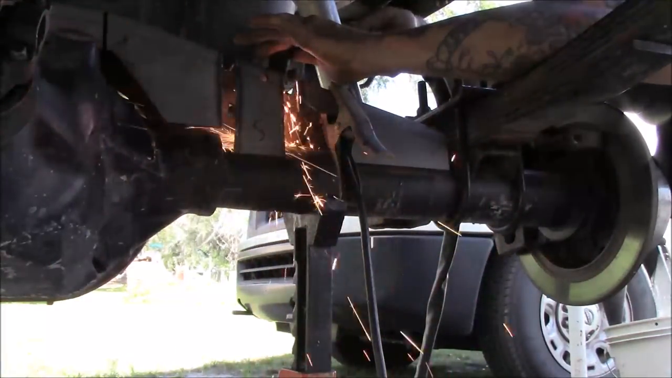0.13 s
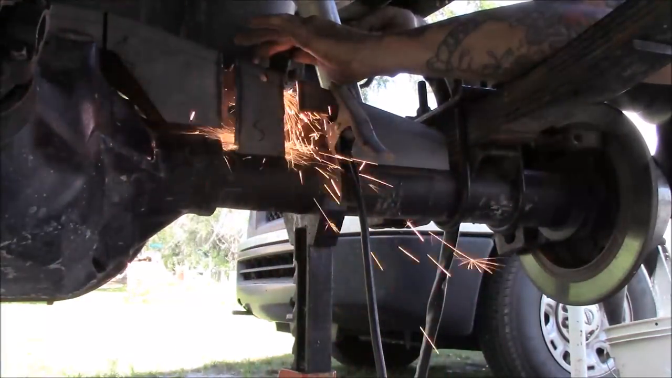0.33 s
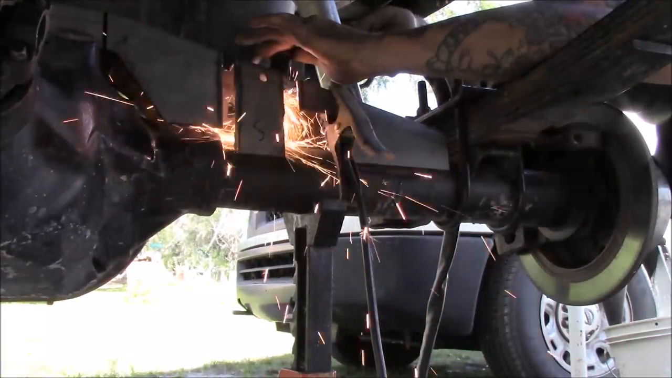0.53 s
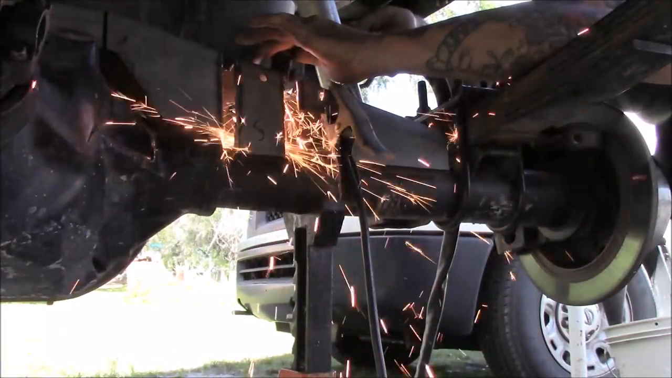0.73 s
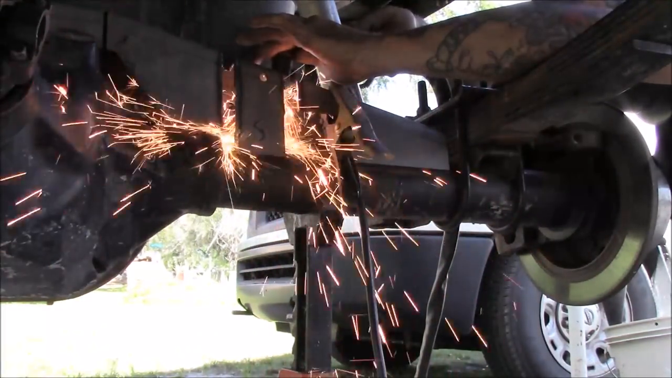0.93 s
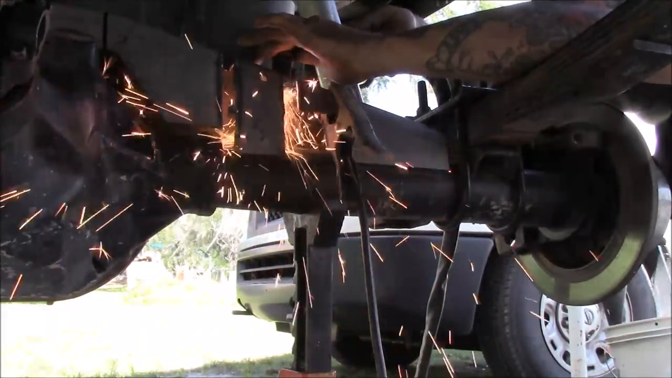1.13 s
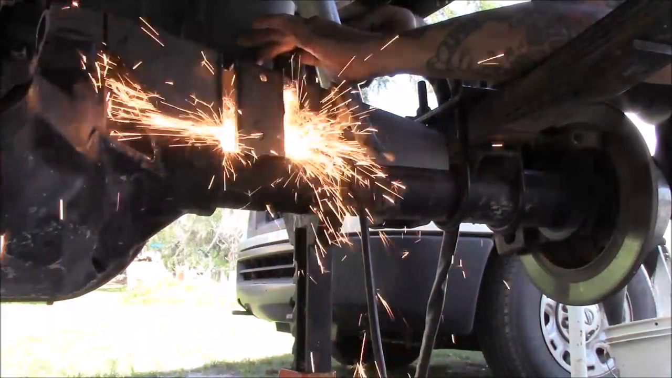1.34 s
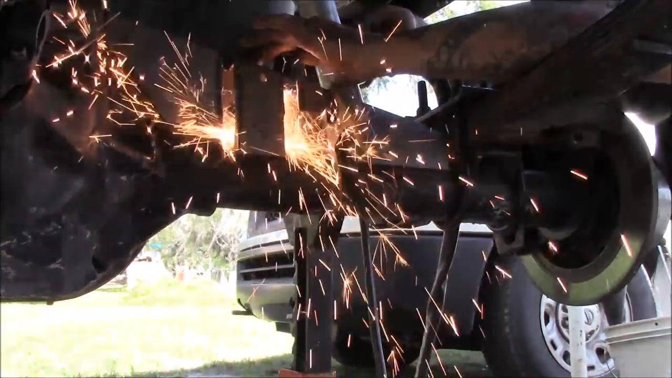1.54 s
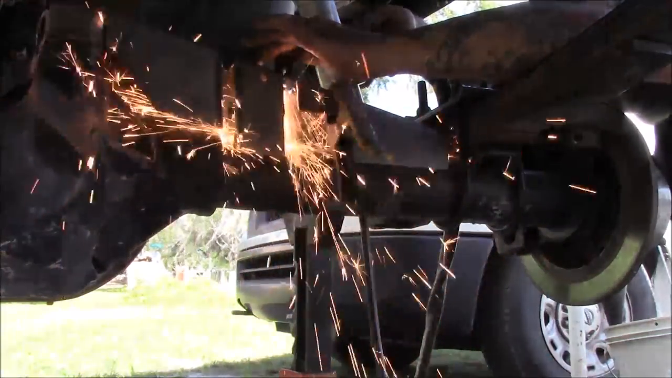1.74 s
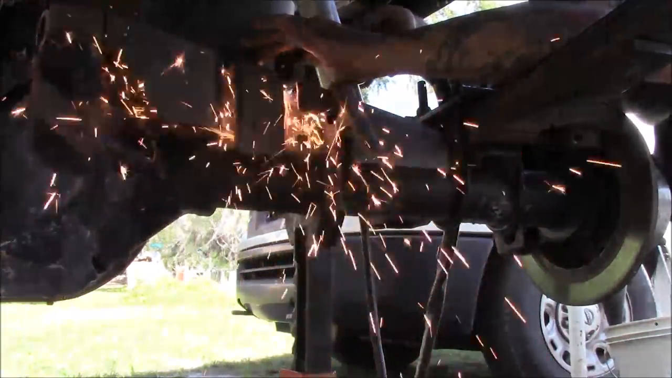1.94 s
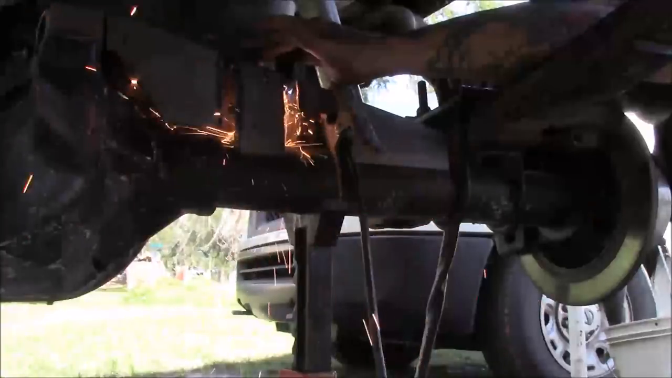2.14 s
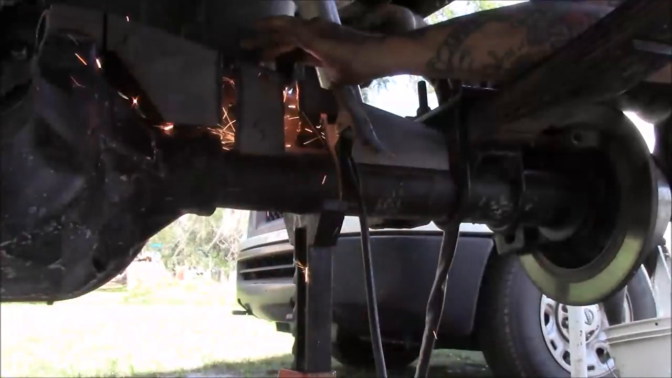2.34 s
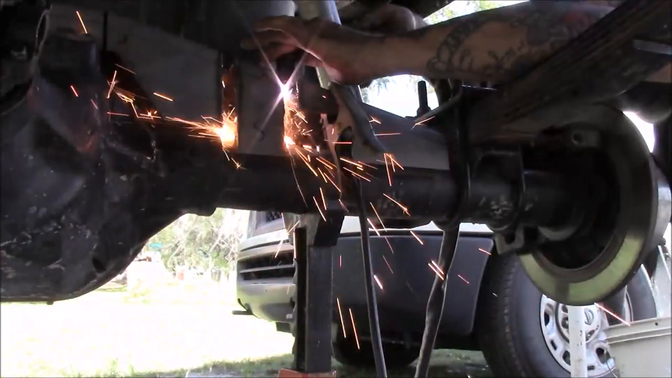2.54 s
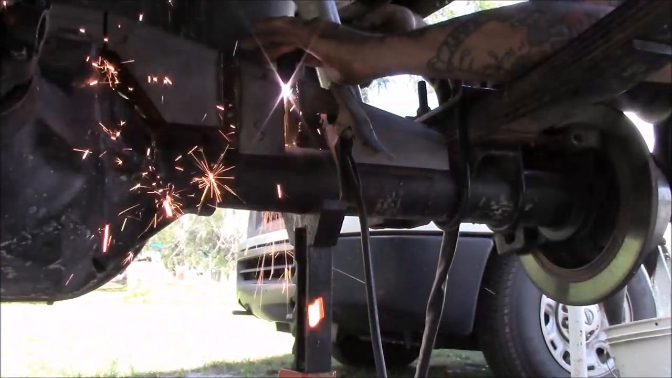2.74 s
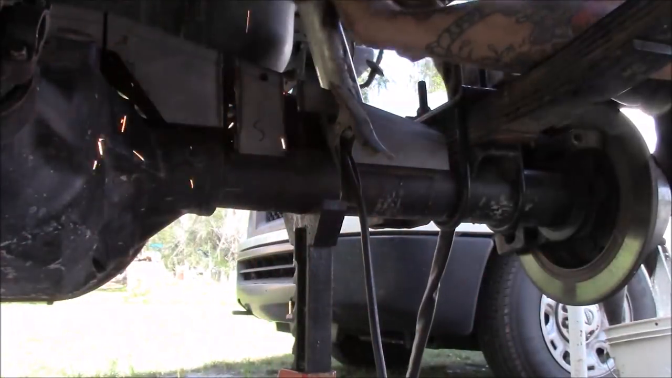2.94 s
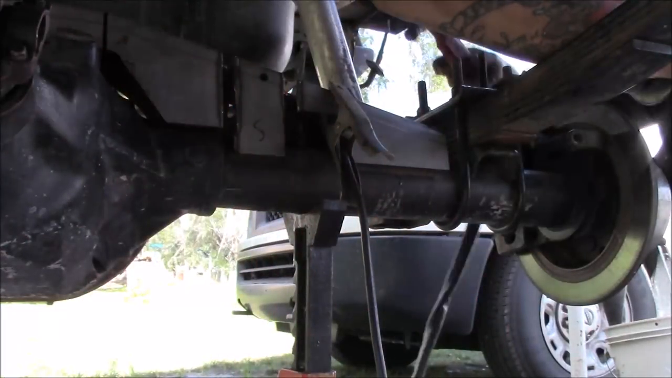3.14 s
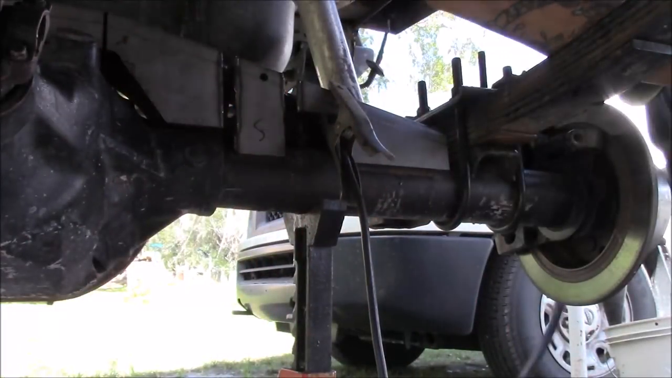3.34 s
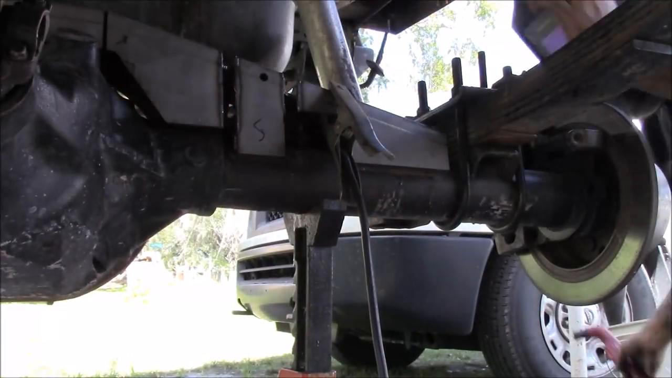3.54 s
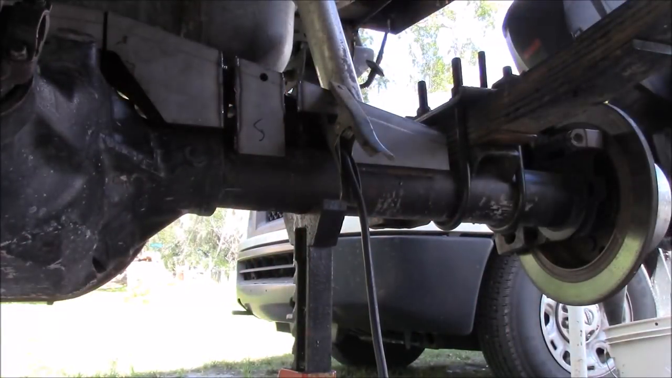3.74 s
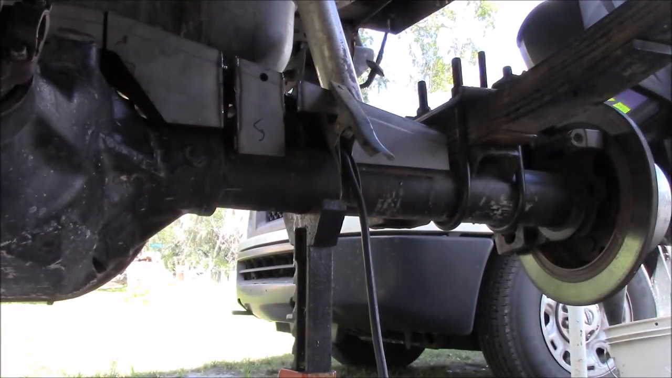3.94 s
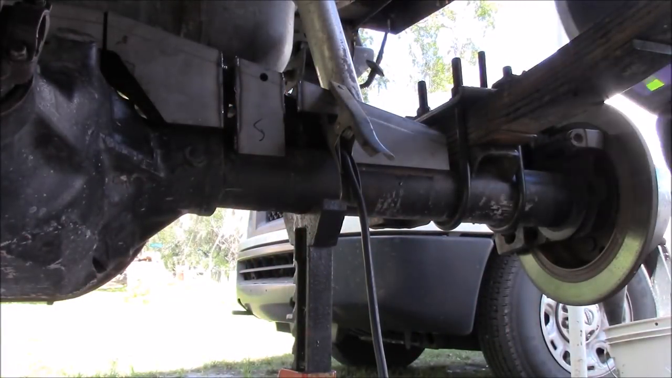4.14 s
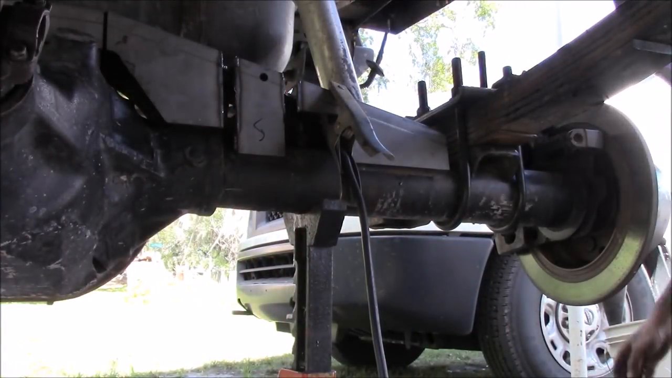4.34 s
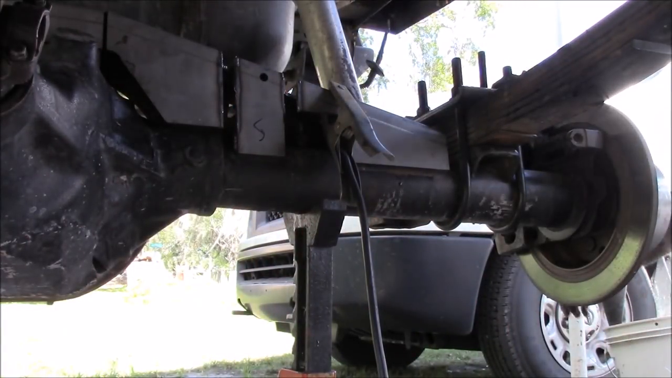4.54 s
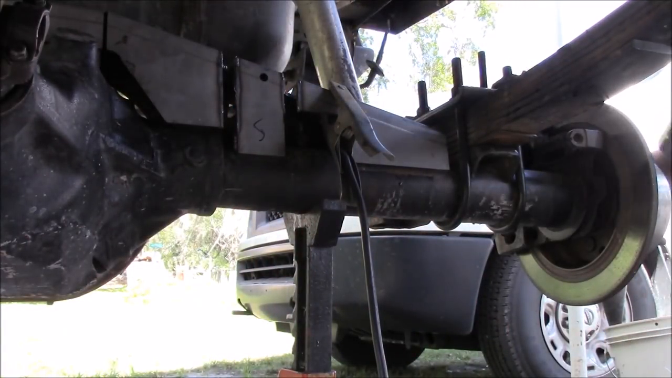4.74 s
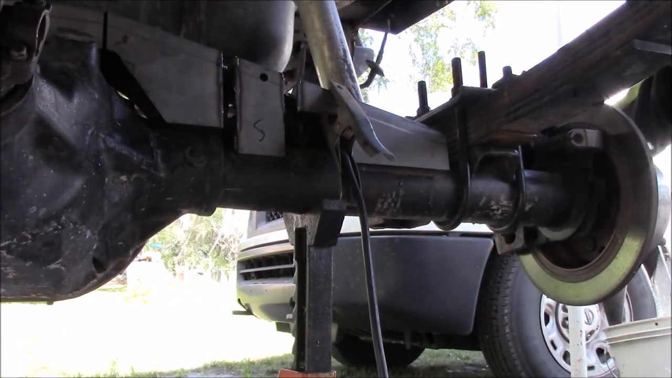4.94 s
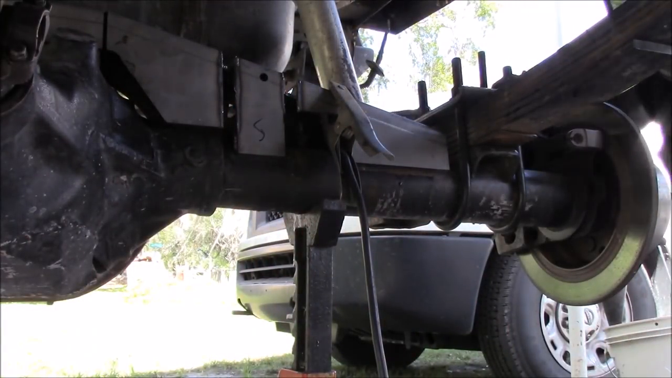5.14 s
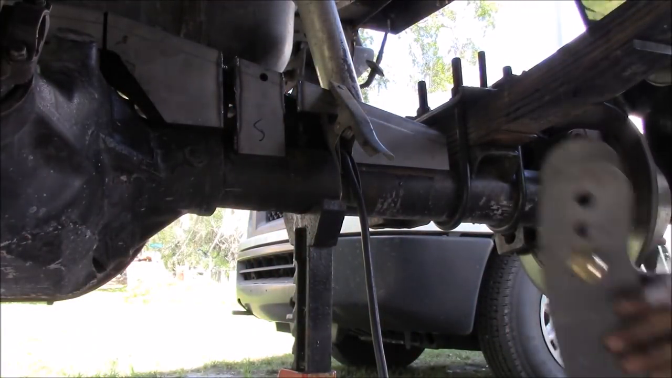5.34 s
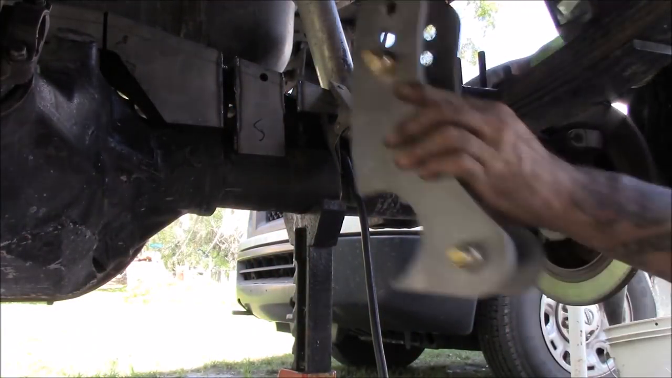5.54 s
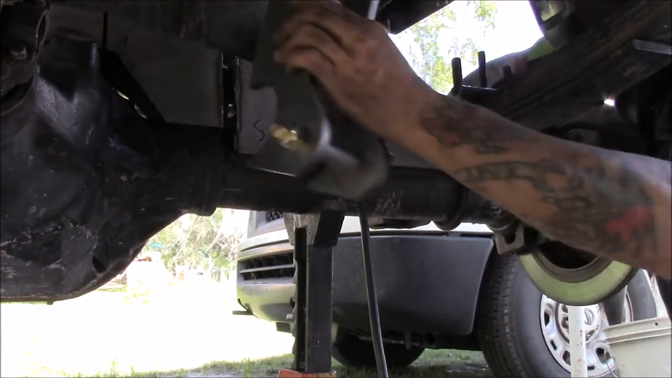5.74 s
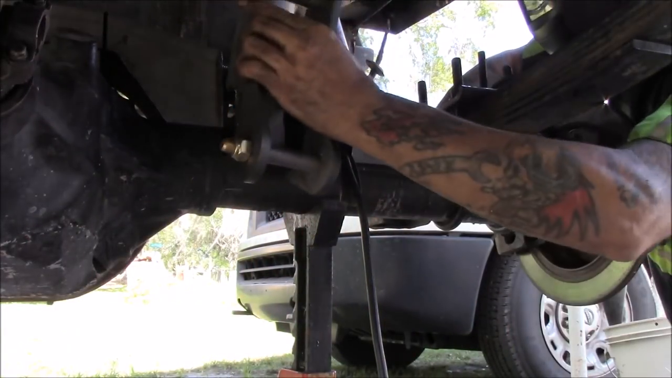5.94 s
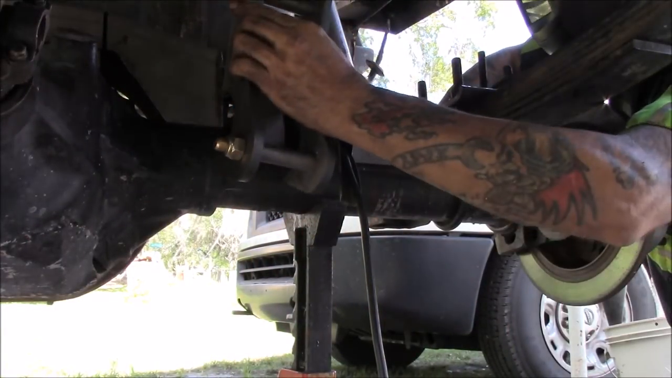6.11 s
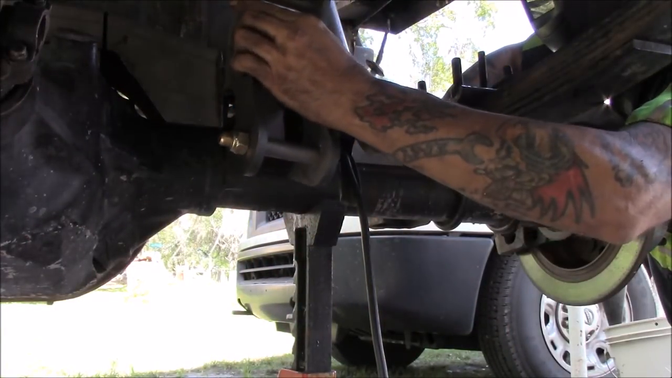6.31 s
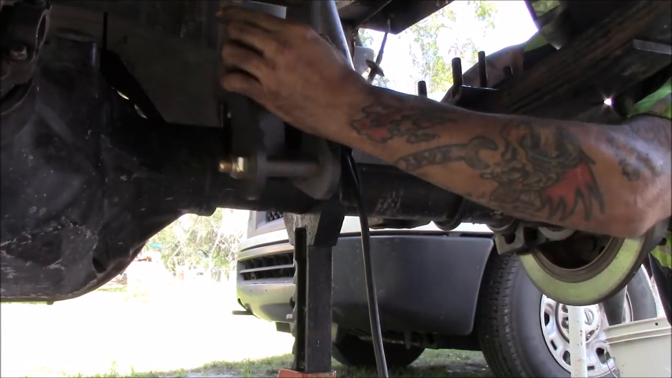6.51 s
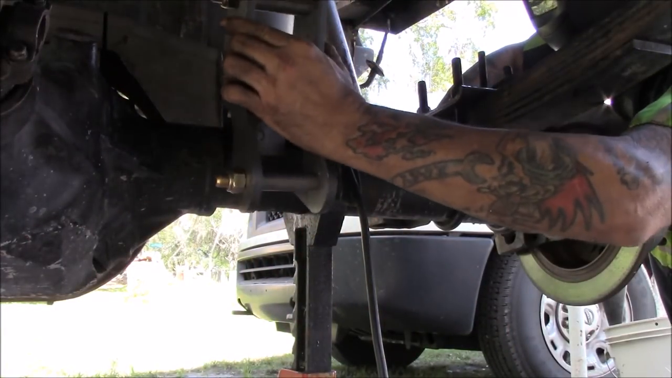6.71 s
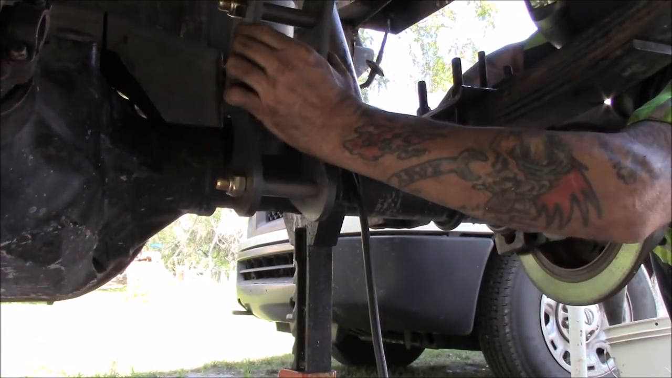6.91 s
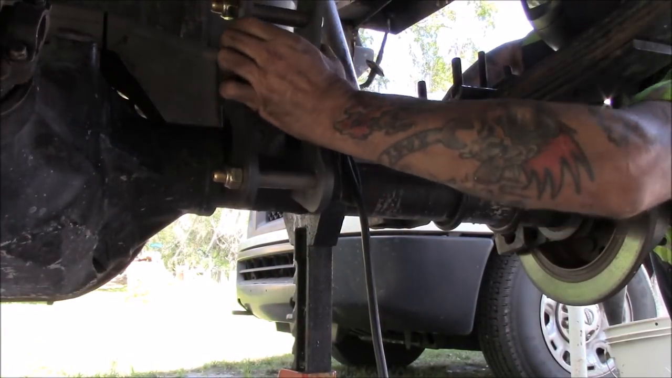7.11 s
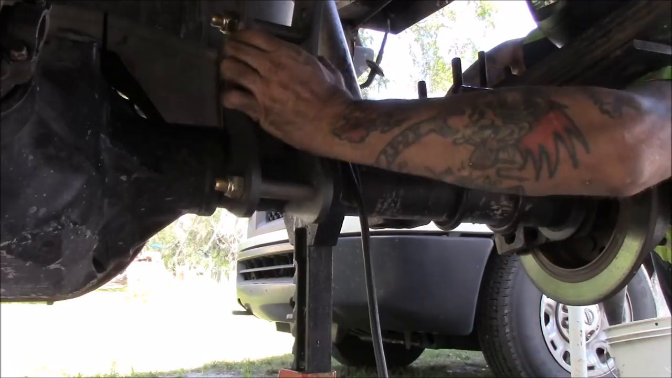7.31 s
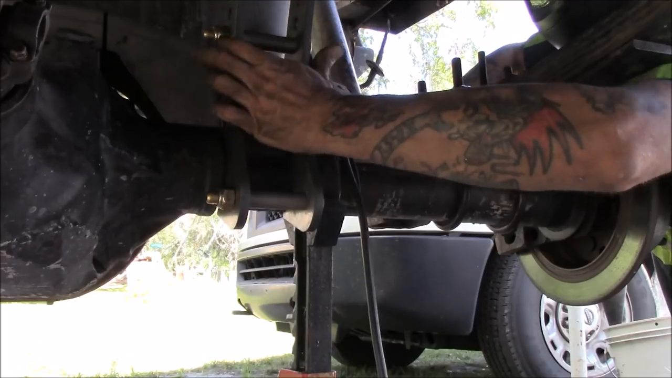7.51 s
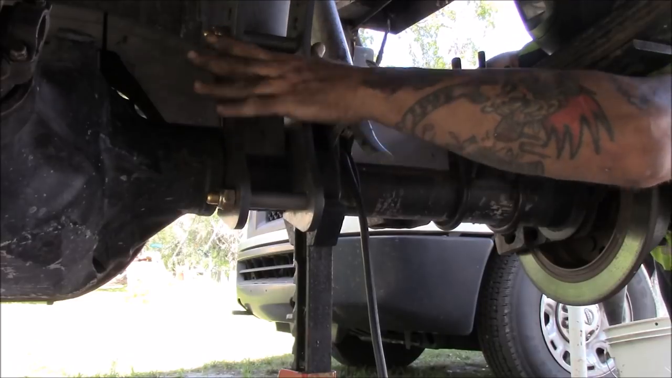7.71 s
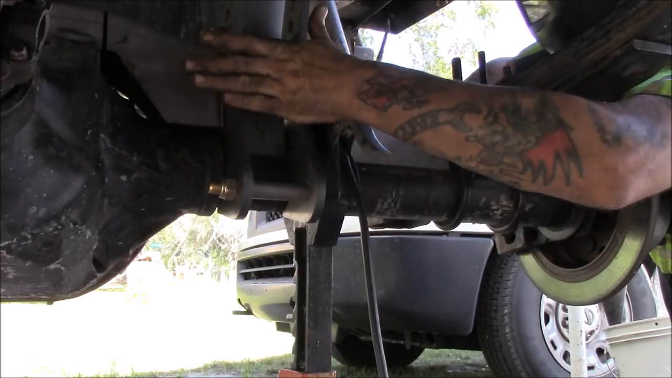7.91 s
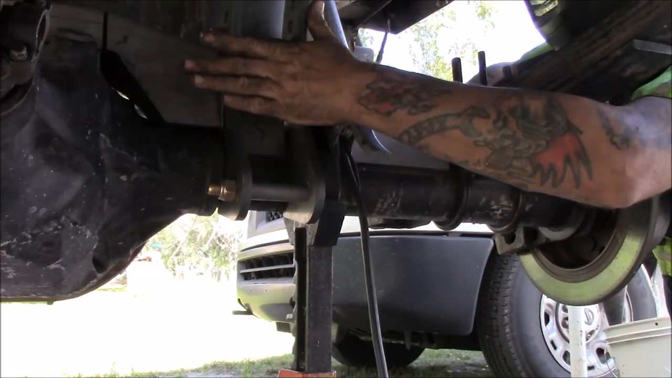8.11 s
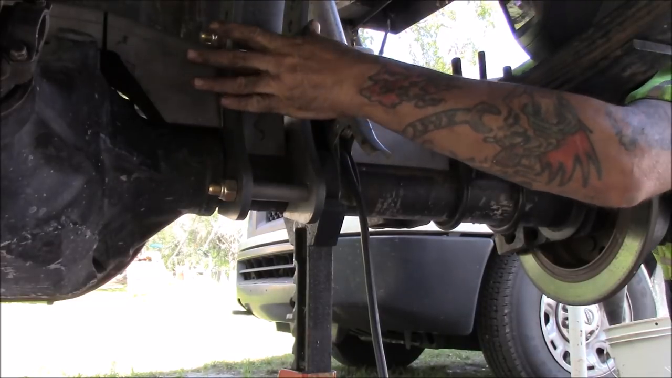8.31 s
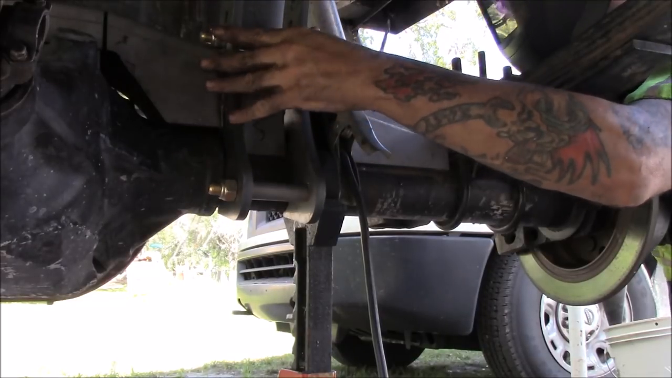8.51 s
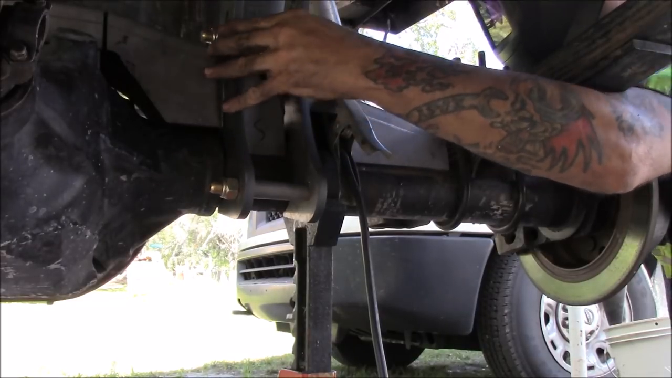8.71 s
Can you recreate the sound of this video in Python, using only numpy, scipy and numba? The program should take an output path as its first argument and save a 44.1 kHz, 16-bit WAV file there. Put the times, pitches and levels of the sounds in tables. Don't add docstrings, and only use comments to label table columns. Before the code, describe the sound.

From 0 to 2.8 s a welding arc sizzles close to the microphone: dense bright hiss with rapid spatter crackle, its level and pitch colour wavering, louder around 1.3-1.6 s, ringing in the hollow axle housing. At 2.8 s it snaps off. Small metallic touches and rustling follow to 3.3 s, with a thin bright clink at 3.0 s as the torch is put down. Then only quiet gas hiss and low yard rumble, creeping up and becoming fuller around 4-4.5 s. At about 6.0 s a steel bracket strikes hard, with more clanks to 6.45 s; further clusters fall at 6.6-6.9, 7.0-7.25 and 7.4-7.5 s, then a strong double knock at 7.9 s. Hits are short, choked, gritty, with chassis boom and some lingering ring. A faint breeze rumble swells near 6.8 s. Softer bumps come at 8.6-8.75 s over the hiss. Short, dull reverberation.

```python
import sys
import numpy as np
from scipy import signal
from scipy.fft import rfft, irfft
from scipy.io import wavfile
from scipy.ndimage import uniform_filter1d, map_coordinates
from numba import njit

SR = 44100
rng = np.random.default_rng(int(sys.argv[2]) if len(sys.argv) > 2 else 0)


def put_to_file(sound):
    columns = np.atleast_2d(sound).T
    safe = np.clip(columns, -1, 1)
    whole_steps = np.round(safe * 32767)
    wavfile.write(sys.argv[1], SR, whole_steps.astype(np.int16))


def invert_db(x):
    u = np.asarray(x, float) / 20
    return 10 ** u


N = 390714
ARC_END_S = 2.812


def unit(x):
    return x / np.sqrt(np.mean(x ** 2))


def walk(rate):
    k = int(SR / rate)
    steps = np.repeat(rng.standard_normal(N // k + 1), k)
    return 0.8 * uniform_filter1d(uniform_filter1d(steps, k), k)[:N]


def on_log(table, hz):
    table_hz, value = np.transpose(table)
    return np.interp(np.log(np.maximum(hz, 1)), np.log(table_hz), value)


def bands(x, colour, edges_hz):
    hz = np.fft.rfftfreq(N, 1 / SR)
    spec = rfft(x) * invert_db(on_log(colour, hz))
    above = [np.clip(6 * np.log2(np.maximum(hz, 1) / e) + .5, 0, 1) for e in edges_hz]
    return [irfft(spec * (a - b), N) for a, b in zip(above, above[1:])]


def low_pass(x, order, hz):
    return signal.sosfilt(signal.butter(order, hz, fs=SR, output="sos"), x)


def spin(table, t):
    hz, db, t60 = np.array(table).T[:, :, None]
    return invert_db(db) * np.exp((2j * np.pi * hz - np.log(1000) / t60) * t)


def turn(modes):
    return np.exp(2j * np.pi * rng.random(len(modes)))


def reflect(x, echoes, diffuse_db, drift):
    ir = np.diff(rng.standard_normal(801) * np.exp(-np.arange(801) / 200))
    out = x + invert_db(diffuse_db) * signal.fftconvolve(x, ir / np.linalg.norm(ir))[:N]
    for ms, gain in echoes:
        delay = ms / 1000 * SR * (1 + drift * walk(1.15))
        out = out + gain * map_coordinates(x, [np.arange(N) - delay], order=3)
    return out


def arc():
    # (time [s], sizzle level [dB], gap [0-1], a longer arc fizzes higher)
    arc_path = [(0, -22, 0.3), (.84, -19.5, 0.6), (1.09, -21.5, 0.16), (1.3, -17, 0.13),
                (1.58, -18.5, 0.93), (1.66, -22, .4), (2.12, -20.5, 0.54), (2.42, -21, 0), (2.66, -20, 1)]
    # (frequency [Hz], density [dB per Hz])
    arc_colour = [(29, -66), (50, -38.5), (289, -12.5), (721, -15.5), (775, -8.5), (1030, -11.5),
                  (1380, -0.5), (1800, -8.5), (2910, -5), (3610, -6), (7250, 0.5), (10600, -0.5),
                  (13200, -3.5), (15600, -9.5)]
    # (frequency [Hz], width [Hz], boost [dB])
    housing = [(820, 91, -2), (1372, 112, 7), (2185, 61, 11), (2800, 460, 5.5), (4540, 200, 5),
               (4890, 80, 4), (5800, 150, 2), (6030, 68, -11), (7200, 360, 2), (8110, 140, 2),
               (8740, 300, 2.5), (9540, 250, -0.5), (10300, 230, 3.5), (11200, 250, 1.5), (12500, 360, 1)]
    spatter_per_s, spatter_db, spatter_spread_db = 350., -17, 2
    sag_from_s, sag_db_per_s = 2.705, -30
    flare_s, flare_half_s, flare_db = 2.64, 0.044, 4
    turn_db_per_s, tail_s = 1, 0.0061
    t = np.arange(N) / SR

    size_db = spatter_spread_db * np.minimum(rng.exponential(size=N), 3.)
    cracks = (rng.random(N) < spatter_per_s / SR) * np.sign(rng.standard_normal(N)) * invert_db(size_db)
    plasma = rng.standard_normal(N) * invert_db(walk(60.23))
    drive = plasma + invert_db(spatter_db) * unit(cracks)
    rung = drive.copy()
    for hz, width, db in housing:
        b, a = signal.iirpeak(hz, hz / width, fs=SR)
        rung = rung + (invert_db(db) - 1) * invert_db(4.7 * walk(5.8)) * signal.lfilter(b, a, drive)

    times, sizzle_db, gap = np.transpose(arc_path)
    sizzle_db, gap = np.interp(t, times, sizzle_db), np.interp(t, times, gap)
    sizzle_db = sizzle_db + sag_db_per_s * np.maximum(t - sag_from_s, 0)
    fizz_db = -4 + 5 * gap
    ring_db = -4 + 1.5 * gap
    roar_db = -18 + 4.5 * gap + 2 * walk(11.7)

    parts = bands(rung, arc_colour, [20, 1000, 2500, 5500, 7500, 10500, 13000, 20000])
    boiling = [b * invert_db(0.21 * walk(2.76) + 0.67 * walk(14)) for b in parts]
    roar, ring_low, ring_high, hiss_low, hiss_high, fizz, top = boiling
    opening_db = turn_db_per_s * (np.minimum(t, ARC_END_S) - ARC_END_S / 2)
    top = top * invert_db(opening_db + flare_db * np.exp(-((t - flare_s) / flare_half_s) ** 2))
    mix = unit(hiss_low + hiss_high) + unit(fizz + top) * invert_db(fizz_db)
    mix = mix + unit(ring_low + ring_high) * invert_db(ring_db) + unit(roar) * invert_db(roar_db)
    return mix * invert_db(sizzle_db) * np.exp(-np.maximum(t - ARC_END_S, 0) / tail_s)


def recovery():
    # (time [s], half length [s], hiss [dB], rustle [dB])
    handling = [
        (2.994, 0.056, 2.5, 13),
        (3.1, 0.086, 1.5, 9.5),
        (3.234, 0.077, 3, -2.5),
    ]
    air_db, held_db, creep_db, overshoot_db = -26, -7.5, 5, 1.5
    climb_from_s, climb_to_s, settled_s = 4.03, 4.36, 6.1
    lows_held_db, lows_from_s, lows_back_s = -9., 3.4, 4.46
    t = np.arange(N) / SR
    gain_db = np.interp(t, [ARC_END_S, climb_from_s, climb_to_s, settled_s],
                        [held_db, held_db + creep_db, overshoot_db, 0])
    lows_db = np.interp(t, [lows_from_s, lows_back_s], [lows_held_db, 0]) - gain_db.clip(0)
    hiss_db, rustle_db = np.zeros(N), np.zeros(N)
    for s, half_s, hiss, rustle in handling:
        swell = np.exp(-((t - s) / half_s) ** 2)
        hiss_db += hiss * swell
        rustle_db += rustle * swell
    return air_db + gain_db + hiss_db, lows_db, rustle_db


def air():
    # (frequency [Hz], density [dB per Hz])
    air_colour = [(18, -56), (30, -25), (250, -0.5), (361, -5.5), (411, -2), (791, -5.5), (856, -7.5),
                  (1600, -4.5), (2380, -10), (3520, -6), (5070, -10), (6600, -5), (10800, -4.5),
                  (14500, -5.5), (15600, -15)]
    level_db, lows_db, rustle_db = recovery()
    edges_hz = [10, 150, 400, 900, 2000, 3500, 5500, 8000, 11000, 20000]
    parts = bands(rng.standard_normal(N), air_colour, edges_hz)
    lowness = [1.8, 1.32, 1.0, 0.96, 0.25, 0.11, 0.038, 0, 0]
    rustling = [0, 0.37, 1, 0.79, 0.3, 0.37, 0, 0, 0.12]
    mix = np.zeros(N)
    for b, low, rustle in zip(parts, lowness, rustling):
        flicker_db = (.5 + 0.7 * low) * walk(6)
        mix += b * invert_db(low * lows_db + rustle * rustle_db + flicker_db)
    return mix / np.std(sum(parts)) * invert_db(level_db)


def contacts():
    # (time [s], peak level [dB], choked after [s])
    torch = [
        (2.807, -7.5, 0.0067),
        (2.869, -21.5, 0.12),
        (2.935, -19, .06),
        (2.973, -17, 0.046),
        (3.069, -22, 0.036),
        (3.3, -26, 0.023),
    ]
    # (time [s], peak level [dB], first face [Hz], second face [Hz], choked after [s])
    blows = [(2.808, -9, 2500, 1200, 0.0068), (5.977, -3, 913, 2360, 0.085),
             (6.059, -7.5, 1040, 2280, 0.035), (6.235, -5, 1430, 1110, 0.12), (6.245, -5, 827, 2280, 0.028),
             (6.268, -8.5, 250, 1320, 0.024), (6.279, -4.5, 790, 2230, 0.02), (6.636, -3, 1610, 902, 0.067),
             (6.678, -6.5, 916, 1640, 0.089), (6.76, -7.5, 1150, 2300, 0.13), (6.83, -16, 2300, 4400, .03),
             (7.03, -12.5, 2330, 4500, .02), (7.049, -17, 1030, 2290, .045), (7.142, -8.5, 785, 1730, 0.13),
             (7.157, -7, 734, 4400, 0.051), (7.173, -4, 1530, 776, 0.053),
             (7.175, -10.5, 2930, 4600, 0.022), (7.415, -4.5, 1115, 1410, 0.11),
             (7.45, -2, 536, 1630, 0.017), (7.47, -8, 382, 900, .04), (7.884, -1, 894, 1960, 0.028),
             (7.885, -4.5, 4980, 1790, 0.013), (7.905, -4, 1030, 624, 0.11),
             (7.965, -4.5, 516, 1190, 0.017)]
    # (time [s], peak level [dB], face [Hz], choked after [s])
    bumps = [(5.977, -3, 1320, 0.017), (5.981, -6, 2300, 0.11), (6.252, -7.5, 2285, .14),
             (6.359, -15, 1060, 0.066), (6.383, -13, 515, 0.2), (6.447, -16, 940, .05),
             (6.795, -6.5, 1070, 0.13), (6.829, -5, 767, 0.047), (6.9, -8.5, 624, 0.076),
             (7.018, -6.5, 1070, 0.027), (7.033, -7.5, 517, 0.034), (7.199, -5.5, 533, 0.07),
             (7.225, -8.5, 517, 0.23), (7.38, -11, 770, 0.2), (7.439, -3.5, 1620, .04),
             (7.459, -5, 1060, 0.023), (7.489, -7, 624, 0.032), (7.95, -3.5, 800, 0.015),
             (8.009, -31, 886, 0.039), (8.595, -17.5, 796, 0.061), (8.613, -11.5, 740, 0.033),
             (8.714, -12.5, 522, 0.056), (8.749, -12, 657, 0.034)]
    return ([(s, db, 740, 1420, 0, choke) for s, db, choke in torch]
            + [(s, db, one, two, -11.5, choke) for s, db, one, two, choke in blows]
            + [(s, db, hz, 1.7 * hz, -30.5, choke) for s, db, hz, choke in bumps])


def near_spot(hz, spot_hz):
    octaves = np.log2(hz / spot_hz)
    return 1 / (1 + (octaves / .05) ** 2) + invert_db(-9) / (1 + (octaves / .6) ** 2)


def steel_ring(hz, rings, t, low_hz, high_hz, high_db, choke):
    share = near_spot(hz, low_hz) + invert_db(high_db + 0.5) * near_spot(hz, high_hz)
    held = np.exp(-(t / choke) ** 2.5) + invert_db(-59)
    chatter_db = 2.2 * np.interp(t, np.arange(128) * .004, rng.standard_normal(128))
    return ((share * turn(hz)) @ rings).imag * held * invert_db(chatter_db)


def grit_rattle(t, db, low_hz, high_hz, high_db, choke):
    grit = rng.standard_normal(len(t)) * invert_db(4. * rng.standard_normal(len(t) // 64)).repeat(64)
    grit = grit * (np.exp(-t / (0.4 * choke)) + 0.18 * np.exp(-t / 0.021))

    def band(hz):
        sos = signal.butter(1, [hz / 1.7, hz * 1.7], "band", fs=SR, output="sos")
        return signal.sosfilt(sos, grit) / np.sqrt(hz)

    rattle = low_pass(band(low_hz) + invert_db(high_db + 12.5) * band(high_hz), 2, 4200.)
    return rattle + invert_db(high_db + 0.27 * db - 5.0) * band(4900) * np.exp(-t / 0.003)


def chassis_boom(booms, t):
    shares = invert_db(1.7 * rng.standard_normal(len(booms))) * turn(booms)
    boom = (shares @ booms).imag * (1 - np.exp(-t / 0.037))
    return boom * invert_db(3.4 * np.interp(t, np.arange(64) * 0.016, rng.standard_normal(64)))


def knocks():
    # (frequency [Hz], level [dB], t60 [s])
    steel = [(231.5, 17.5, 0.17), (387, 7.5, 0.067), (517, -4, 0.36), (624, 4, 0.067), (734, 3, 0.054),
             (851, 0.5, 0.32), (877, -20, .5), (1030, -3, 0.12), (1054, -8, 0.38), (1128.5, -1.5, 0.2),
             (1152, -2.5, 0.45), (1332, 3, 0.14), (1522, -1, 0.15), (1635, -0.5, 0.32), (1943, -8, 0.25),
             (2060, -5.5, 0.35), (2281, 1.5, 0.71), (2446, 0.5, .18), (2700, -17, .2), (2953, 8, 0.12),
             (3044, 11, 0.12), (3540, 12.5, 0.047), (3820, -22, .2), (5100, 0, .1), (6260, 10, .08),
             (7150, -1, .1)]
    # (frequency [Hz], level [dB], t60 [s])
    frame = [(72, -13, .25), (110, -8.5, 0.21), (154.3, -10, 0.2), (206.4, -3.5, 0.48), (229, -15, 0.2),
             (288, 5.5, 0.14), (333.6, 1, 0.2), (415.4, -6.5, 0.23), (516.6, -1, 0.32), (604, 2, 0.088)]
    # (frequency [Hz], level [dB], t60 [s])
    axle_tube = [(876, -31, 0.75), (2470, -38, 0.58)]
    seated_s, loose_tube_db = 6.6, -10
    size = 2 ** 15
    out, t = np.zeros(N + size), np.arange(size) / SR
    hz = np.array(steel)[:, 0]
    rings, booms, tubes = spin(steel, t), spin(frame, t), spin(axle_tube, t)
    touches = contacts()
    for s, db, low_hz, high_hz, high_db, choke in touches:
        choke = max(choke, .004)
        ring = steel_ring(hz, rings, t, low_hz, high_hz, high_db, choke)
        rattle = grit_rattle(t, db, low_hz, high_hz, high_db, choke)
        boom = invert_db(-22.0) * chassis_boom(booms, t) * choke / 0.082
        tube = (turn(tubes) @ tubes).imag / (1 + (np.log2(low_hz / axle_tube[0][0]) / 0.56) ** 2)
        tube = tube * invert_db(loose_tube_db * (s < seated_s))
        mix = ring / np.abs(ring).max() + invert_db(-4) * rattle / np.abs(rattle).max()
        rise_s = 0.00032 * invert_db(-1.3 * db)
        rise_s = rise_s + .002 * any(.02 < s - other[0] < .04 for other in touches)
        level_db = db + 1.2 * max(db + 7.5, 0)
        i = int(s * SR)
        out[i:i + size] += invert_db(level_db) * (mix + boom + tube) * (1 - np.exp(-t / rise_s))
    return out[:N]


def clink():
    # (frequency [Hz], level [dB], t60 [s])
    nozzle = [(1994, -4, 0.41), (3080, -2, 0.18), (4400, -6, .03), (5720, 2, 0.045), (6330, 5, .04),
              (7250, 4, .08)]
    size, start = 2 ** 15, int(2.999 * SR)
    out, t = np.zeros(N), np.arange(size) / SR
    ring = (turn(nozzle) @ spin(nozzle, t)).imag
    scrape = 1.3 * np.diff(rng.standard_normal(size + 1)) * np.exp(-t / .008)
    out[start:start + size] = invert_db(-27) * (ring + scrape)
    return out


def shop(x):
    t60_s, wet_db, dull_hz = 0.32, -15.5, 900
    tail = rng.standard_normal((2, SR)) * np.exp(-np.log(1000) * np.arange(SR) / SR / t60_s)
    tail = low_pass(tail, 1, dull_hz)
    return invert_db(wet_db) * signal.fftconvolve(x[None], tail / np.linalg.norm(tail[0]))[:, :N]


def breeze():
    middle_s, half_s, level_db, top_hz = 6.8, 0.64, -51, 110
    t = np.arange(N) / SR
    rumble = low_pass(rng.standard_normal(N), 4, top_hz)
    return unit(rumble) * invert_db(level_db + 4. * walk(6)) * np.exp(-((t - middle_s) / half_s) ** 2)


def scene():
    # (delay [ms], gain [ratio])
    arc_echoes = [(.88, -.1), (1.33, .12), (1.68, .12), (2.25, -.18), (3.2, -.16)]
    air_echoes = [(.73, 0.068), (1.2, 0.017), (2.1, 0.041), (3.15, 0.02), (3.6, 0.028), (4.7, 0.015)]
    # (frequency [Hz], level [dB])
    near_side = [(30, -12), (140, -12), (300, -0.5), (700, -4), (1800, -13), (4000, -20), (9500, -18),
                 (15000, -22)]
    knock_side = [(30, -35), (300, -34), (700, -28), (1200, -23), (3000, -17.5), (15000, -21)]
    air_side = [(30, -18), (120, -22), (250, -23.5), (900, -23.5), (1500, -36), (5000, -16.5), (8000, -16),
                (15000, -16.5)]
    weld = reflect(arc(), arc_echoes, -12, .03)
    far = reflect(air(), air_echoes, -7.0, 0.0077)
    hits = knocks() + clink()
    wet_mid, wet_side = shop(hits)
    near = weld + hits + wet_mid

    echo = rng.standard_normal(8192) * np.exp(-np.arange(8192) / SR / .01)
    echo = echo / np.linalg.norm(echo)

    def scatter(x, colour):
        return bands(signal.fftconvolve(x, echo)[:N], colour, [5, 21000])[0]

    side = scatter(weld, near_side) + scatter(hits, knock_side) + scatter(far, air_side)
    side = side + invert_db(-36) * wet_side + breeze()
    return (near + far) * invert_db([[.12], [-.12]]) + side * np.array([[1], [-1]])


@njit
def follow(x, attack, release):
    e, out = 0., np.empty(len(x))
    for i in range(len(x)):
        e += (x[i] - e) * (attack if x[i] > e else release)
        out[i] = e
    return out


def top_cut(x):
    return signal.sosfilt(signal.butter(12, 15790, fs=SR, output="sos"), x)


def record(dry):
    attack_s, release_s, threshold_db = .0007, .035, -4
    peak = follow(np.abs(dry).max(axis=0), 1 / (attack_s * SR), 1 / (release_s * SR))
    held = dry * np.minimum(invert_db(threshold_db) / (peak + 1e-9), 1) ** 1.1
    held = np.clip(held, -.92, .92)
    held = signal.sosfilt(signal.butter(3, 45., "high", fs=SR, output="sos"), held)
    held = signal.sosfilt(signal.ellip(8, .2, 70, 15750, fs=SR, output="sos"), held)
    return top_cut(held)


dry = scene()
out = record(dry)
put_to_file(out)
```